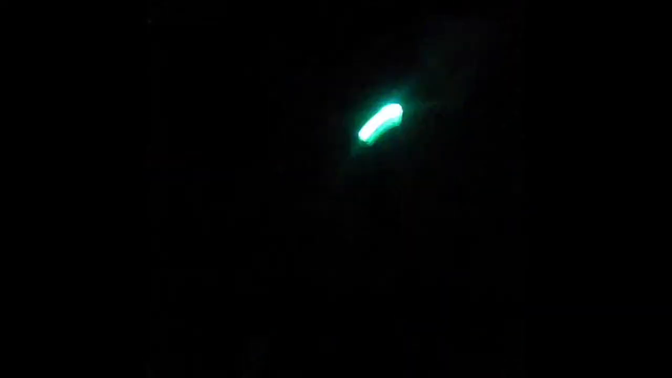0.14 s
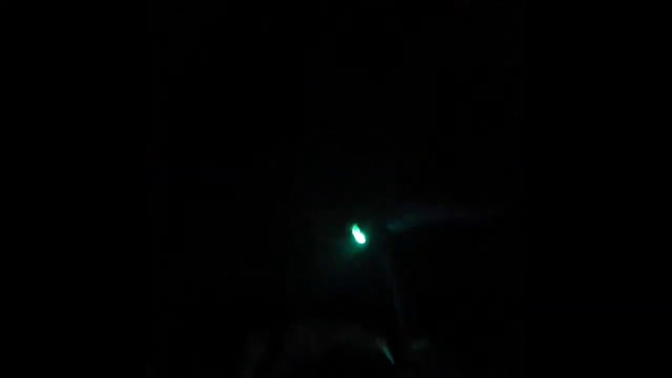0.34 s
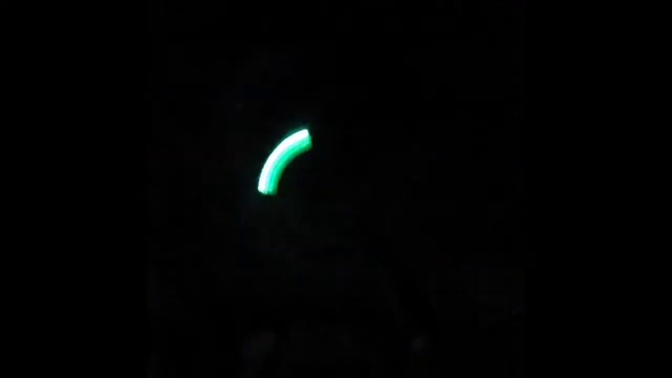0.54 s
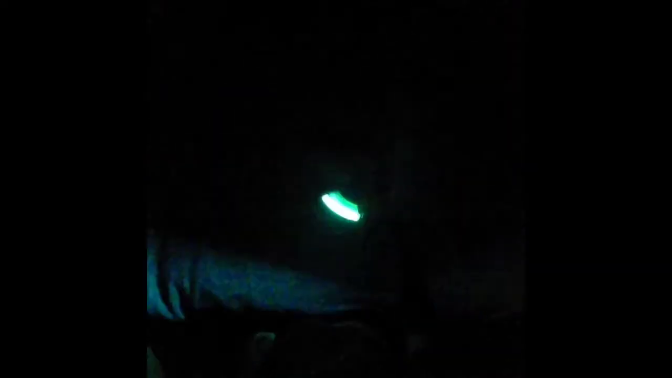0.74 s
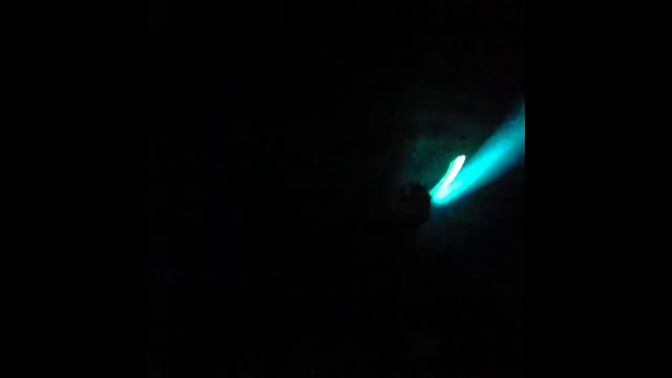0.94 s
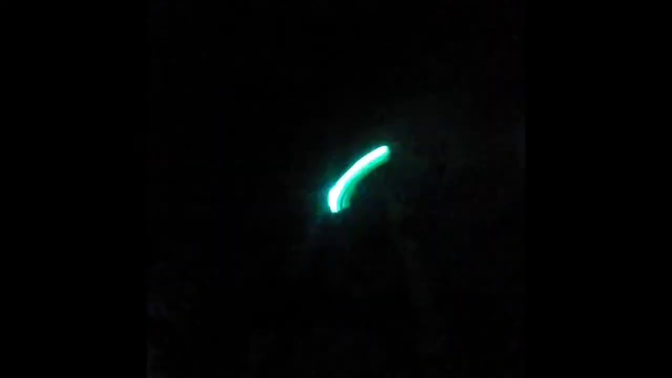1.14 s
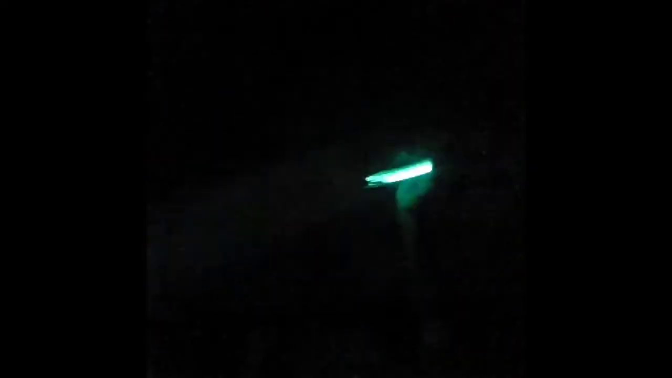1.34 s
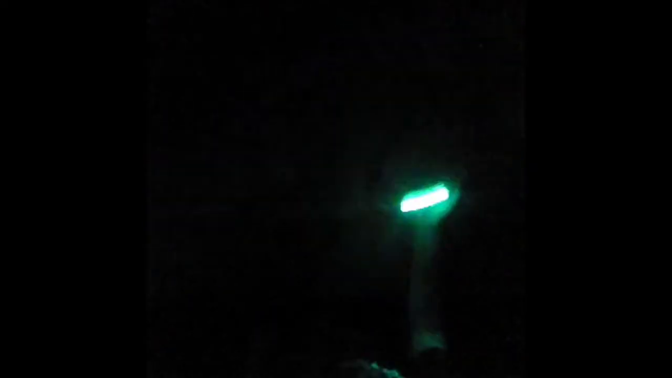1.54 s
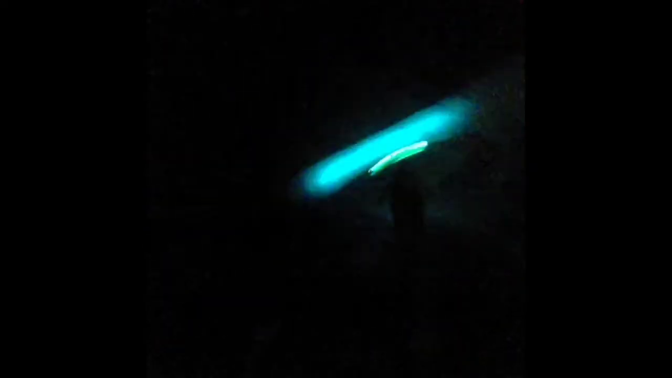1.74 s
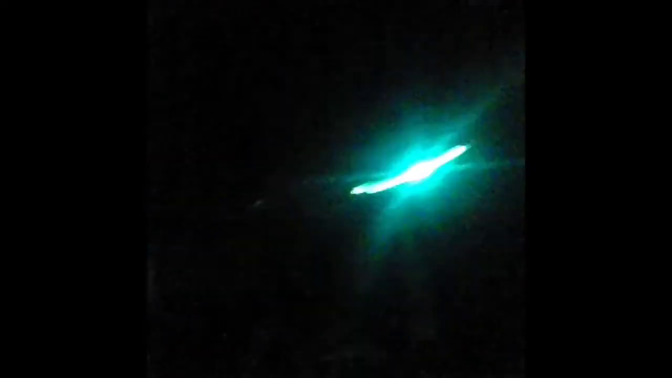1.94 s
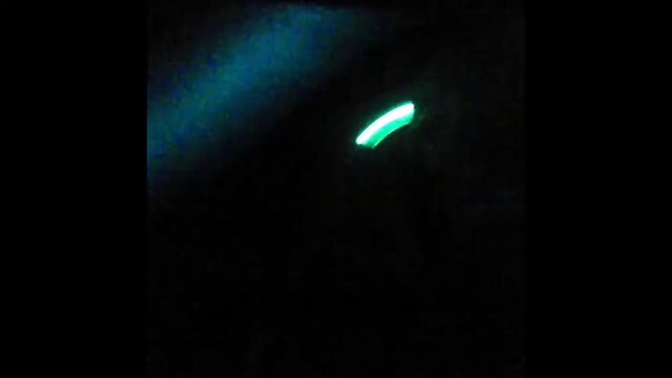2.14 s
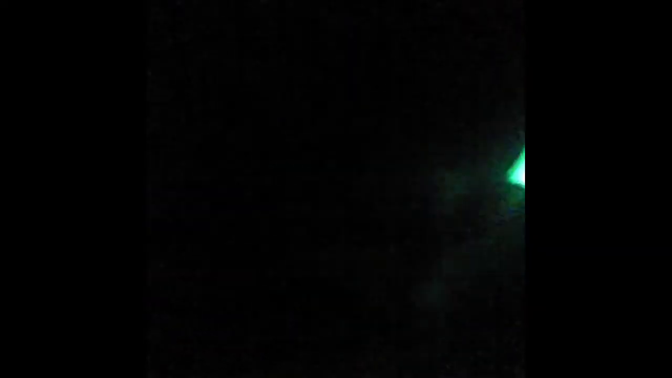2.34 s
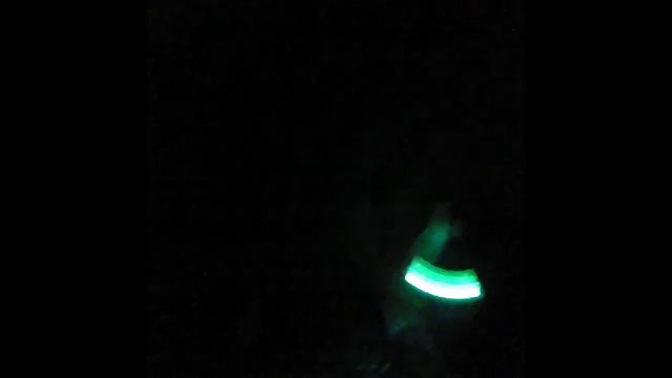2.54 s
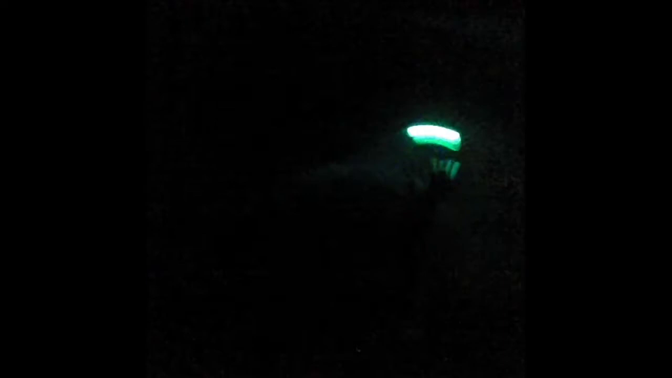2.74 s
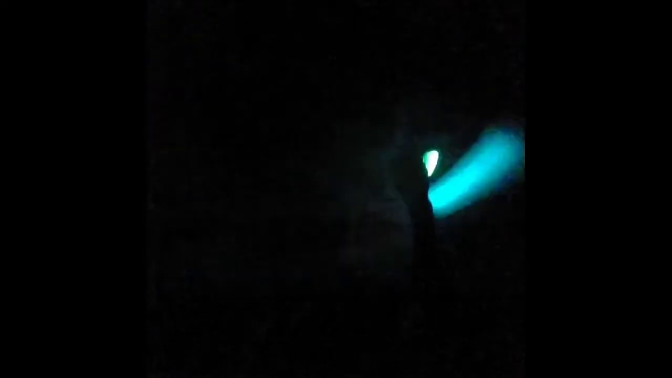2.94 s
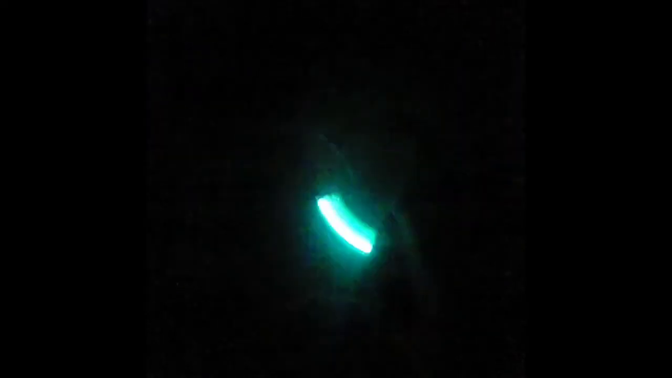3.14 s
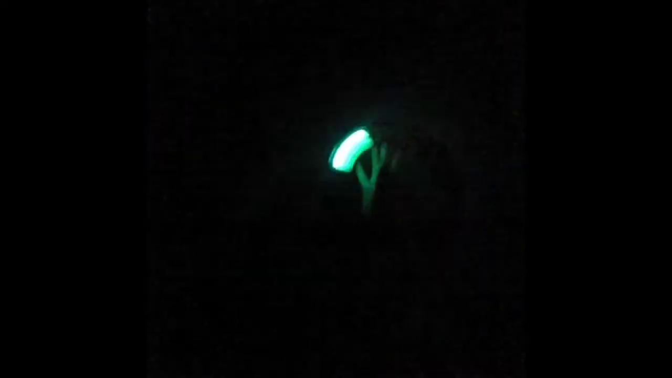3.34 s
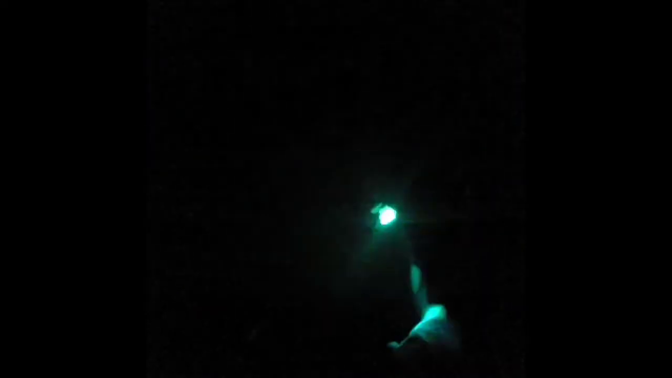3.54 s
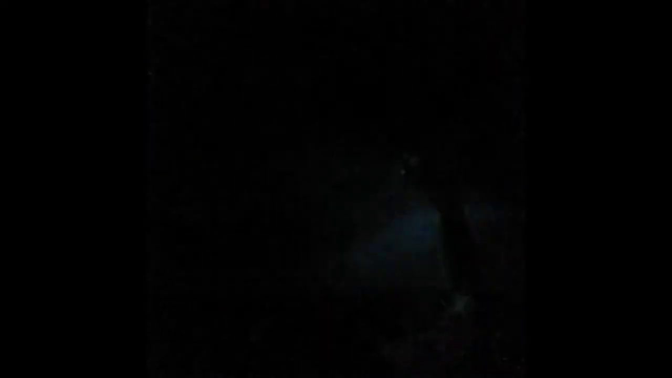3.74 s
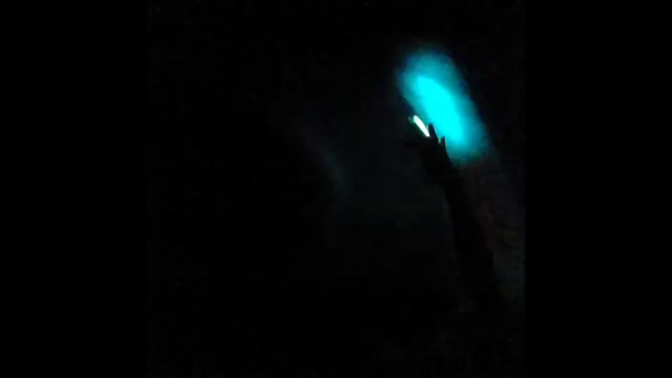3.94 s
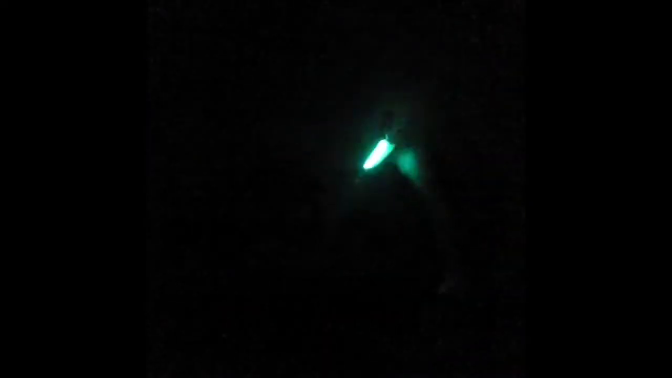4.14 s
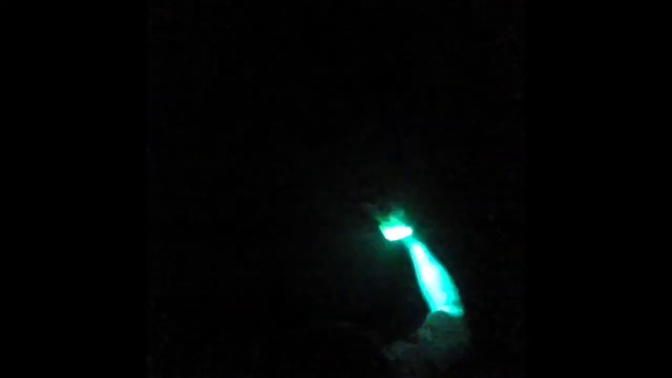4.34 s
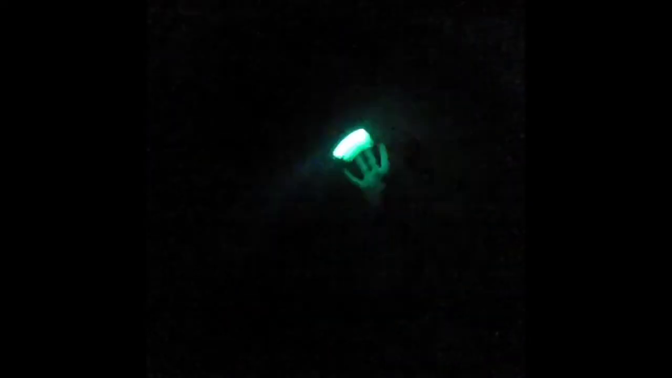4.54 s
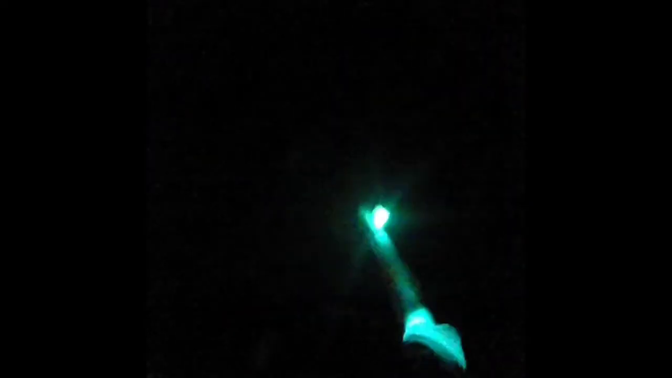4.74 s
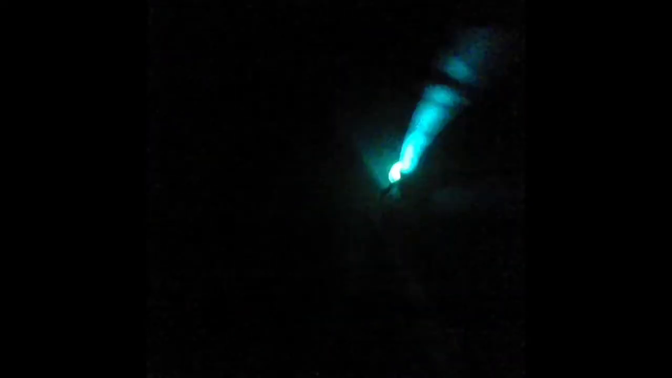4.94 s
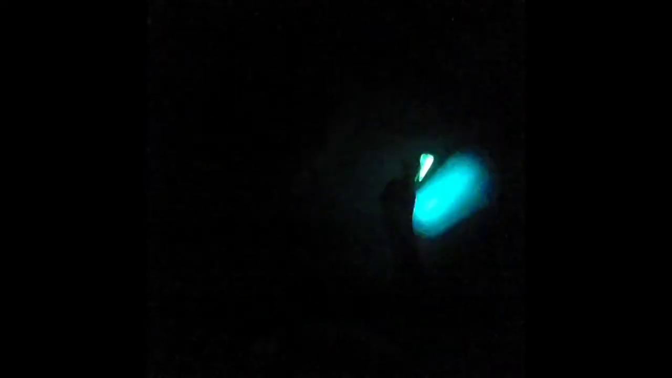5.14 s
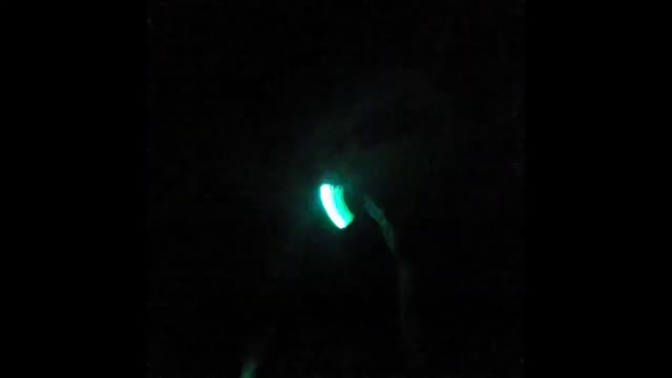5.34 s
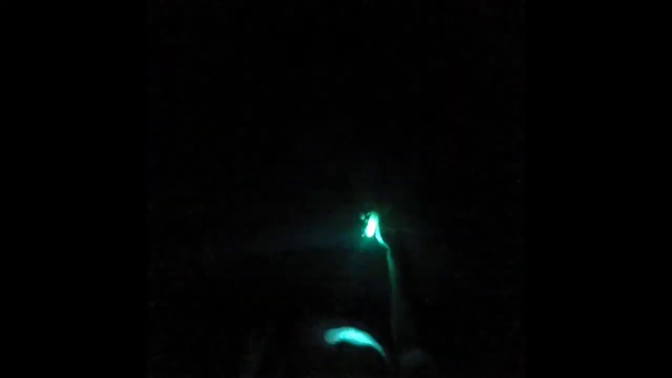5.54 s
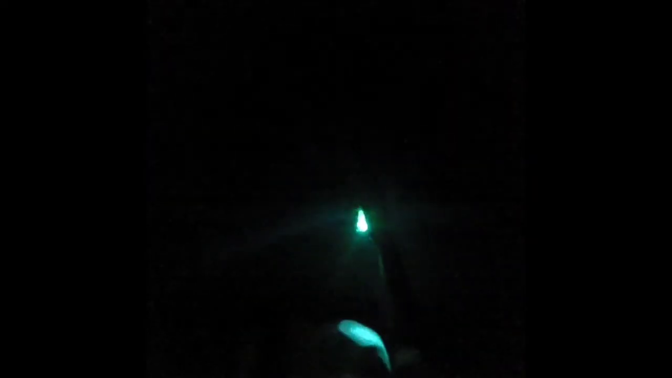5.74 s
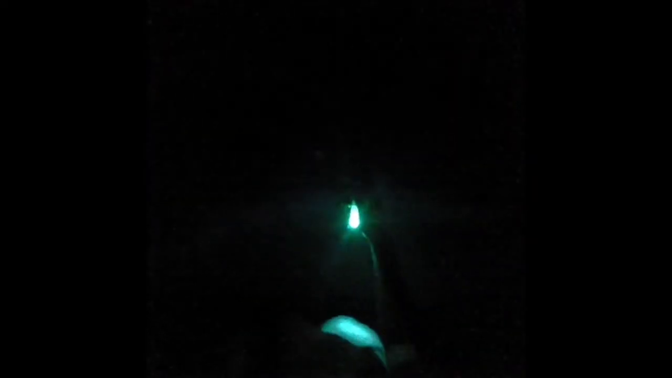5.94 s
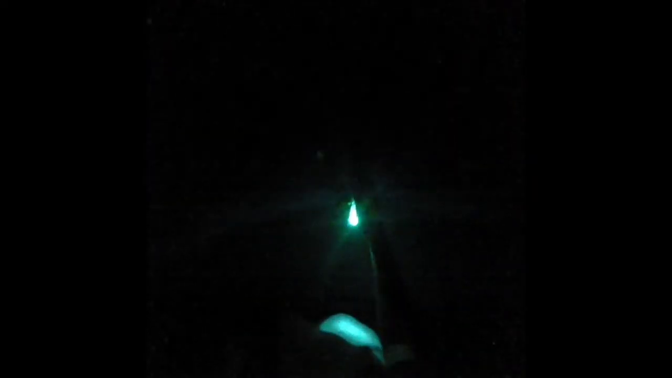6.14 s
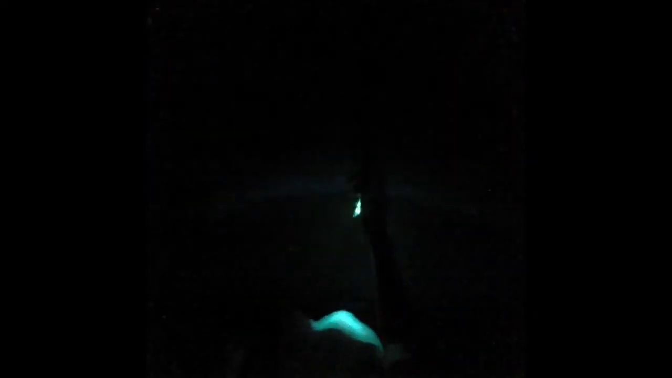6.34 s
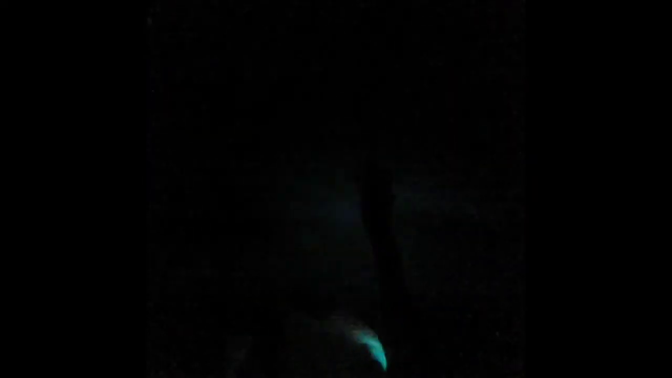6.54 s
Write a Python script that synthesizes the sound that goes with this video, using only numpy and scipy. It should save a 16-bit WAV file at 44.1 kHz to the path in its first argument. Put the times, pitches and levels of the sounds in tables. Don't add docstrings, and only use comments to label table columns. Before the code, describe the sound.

Close, dry metallic clacking of a flipped butterfly-style knife in a small room, with ticks, rattles, short pings and one loud closing slam.

```python
import sys
import numpy as np
from scipy import signal
from scipy.fft import rfft, irfft
from scipy.io import wavfile
from scipy.ndimage import uniform_filter1d

SR = 44100
rng = np.random.default_rng(int(sys.argv[2]) if len(sys.argv) > 2 else 0)


def master_out(mix):
    frames = np.transpose(np.atleast_2d(mix))
    ceiling = np.clip(frames, -1, 1)
    pcm = np.round(ceiling * 32767).astype(np.int16)
    wavfile.write(sys.argv[1], SR, pcm)


def gain_from_db(level_db):
    decades = np.asarray(level_db, float) / 20
    return 10 ** decades


N = 295029

PART_BORDERS_HZ = [700, 3200, 5500, 6800, 9200, 15500]
# [pitch_hz, level_db]
CRACK_COLOUR = [(200, -31.5), (550, -19.5), (900, -12), (1250, -8.5), (1700, -1.5), (3200, -3.5),
                (4500, 4.5), (5800, -5), (7900, 0), (9300, -2), (12600, -2), (13700, -4.5), (14250, -17),
                (14800, -7), (15600, -12)]
# [pitch_hz, level_db, t60_s]
STEEL_MODES = [(860, -11, 0.036), (1670, -6.5, 0.021), (2556, -11.5, 0.013), (4104, -14, 0.037),
               (4610, -11.5, 0.037), (4790, -13, 0.029), (6420, -7, 0.035), (7580, -9, 0.026),
               (7280, -8, 0.021), (7930, 1, 0.021), (8030, -8, 0.03), (8670, -8.5, 0.024),
               (9530, -5, 0.015), (9940, -10.5, 0.019), (10260, -7, 0.014), (11130, -3, 0.03),
               (11770, -4, 0.015), (12140, -11.5, 0.023), (12640, -2, 0.026), (13170, -5, 0.016),
               (15200, -12, .03)]
# [pitch_hz, t60_s]
ROOM_DECAY = [(500, 0.12), (2000, 0.14), (5000, 0.15), (12000, 0.11)]
# [pitch_hz, level_db]
HUM_LINES = [
    (293, -73),
    (239, -77.5),
]
# [start_s, level_db, pitch_hz, width_hz,
# t60_s]
THUMPS = [(1.006, -53.5, 536, 250, 0.1), (1.007, -55, 210, 79.8, 0.11), (1.49, -58, 497.4, 300, .1),
          (1.724, -58, 764, 597, 0.061), (1.813, -48.5, 249, 114, 0.14), (1.815, -42, 838, 200, 0.073),
          (1.82, -57, 619, 500, 0.32), (2.047, -54, 896, 350, 0.071), (2.935, -66, 679, 80, 0.11),
          (5.423, -52, 250.3, 120, 0.092), (6.045, -61.5, 170, 59.8, 0.22), (6.08, -62, 632, 601, 0.11)]
# [pitch_hz, level_db per Hz]
HISS_COLOUR = [(30, -10), (90, -28.5), (112, -12.5), (190, -2.5), (310, -11.5), (350, -15), (900, -20),
               (1600, -22), (5500, -24), (9700, -30), (12500, -26.5), (15250, -27.5), (15550, -40.5),
               (16500, -58.5)]
HISS_DB = -65.5
# [start_s, blow_db, wall_share_db]
SLAM_SHUT = (5.4232, -9.5, -5)
# [pitch_hz, level_db per Hz]
SLAM_SPECTRUM = [(150, -45.5), (400, -32.5), (1400, -29), (1950, -22.5), (2520, -18.5), (4570, -11),
                 (6500, -7.5), (8500, -10), (12000, -9), (15400, -16.5)]
# [start_s, blow_db, knock_db, low_ring_db, high_ring_db]
HARD_CLACKS = [(0.2191, -24.5, -21, -14, -2.5), (0.2483, -12, -31, -10.5, -2.5),
               (0.457, -30.5, -20.5, -11.5, -2), (0.6798, -27.5, -15.5, -13.5, -3.5),
               (0.6869, -23, -19, -15, -7), (0.778, -31.5, -15, -14, -6), (1.0095, -19, -21.5, -16.5, -5.5),
               (1.4744, -33, -12, -8, -6.5), (1.4935, -13.5, -21, -16, -6),
               (1.8201, -17.5, -15.5, -11, -3.5), (2.0488, -34, -9, -16.5, -3), (2.394, -34, -15, -18, -5),
               (2.7265, -30, -23.5, -25.5, -5.5), (2.77, -26.5, -16, -8.5, -6),
               (3.4013, -37, -10.5, -6, -5.5), (3.8559, -31, -11.5, -11.5, -3), (4.256, -35, -16, -5.5, -5),
               (4.2771, -25.5, -32, -14, -8.5), (4.2863, -13, -26, -15.5, -2.5),
               (4.5069, -27, -10.5, -15, -8.5), (4.5441, -33.5, -17.5, -11, -2.5),
               (4.7138, -28, -17, -9, -4.5), (5.113, -34, -21, -11, -1), (6.6385, -29, -12.5, -8.5, -3.5)]
# [start_s, blow_db, knock_db, low_ring_db]
PIVOT_TICKS = [(0.1003, -46.5, -11, -13.5), (0.2055, -39, -17, -12.5), (0.3298, -39, -15.5, -3.5),
               (0.426, -44.5, -12, -6.5), (0.5081, -37, -14, -8), (0.6113, -44.5, -3, -18),
               (0.6709, -36.5, -27, -11), (0.8363, -42, -14, -7.5), (1.1181, -43.5, 1, -14),
               (1.1518, -40.5, -6, -7), (1.248, -38.5, -9.5, -11), (1.584, -38.5, -15.5, -14.5),
               (1.7572, -42.5, -11, -8), (1.964, -44.5, -9, -8.5), (2.3035, -34, -15, -11.5),
               (2.59, -37, -14, -10), (3.1365, -46, -24, -2), (3.1652, -41, -11.5, -13),
               (3.351, -40, -12, -7.5), (3.5224, -35, -8.5, -9.5), (3.587, -37.5, -16, -8),
               (4.085, -41, -17, -10.5), (4.1386, -38.5, -11, -10.5), (4.347, -37, -7.5, -11),
               (4.672, -38, -12.5, -9.5), (4.823, -52, -13, -10.5), (5.032, -41, -16, -7.5),
               (5.086, -41, -21, -4), (5.2164, -37.5, -12, -5.5), (5.3747, -40, -18.5, -15)]
# [start_s, blow_db, knock_db]
LIGHT_TOUCHES = [(0.0041, -56.5, -2), (0.0536, -50.5, -20), (0.6084, -48.5, -14), (0.7668, -36, -16),
                 (0.9936, -43.5, -10), (1.2081, -43.5, -3), (1.384, -46, -8.5), (1.4697, -48, -4),
                 (1.816, -39, -7), (1.961, -55, -8), (2.253, -50.5, -5), (2.2998, -44, -21),
                 (2.3909, -45.5, -10), (2.479, -47, -8.5), (2.586, -52, -8), (2.621, -48, -12),
                 (2.646, -48.5, -21), (2.8734, -51, -9), (3.1286, -45.5, -7), (3.266, -47, -16),
                 (3.752, -54, -8.5), (3.786, -48, -8), (3.8077, -44.5, -9.5), (3.923, -42.5, -14),
                 (4.013, -49, -8), (4.904, -44, -9), (5.028, -55, -8), (5.4201, -40, -10),
                 (6.4855, -56, -0.5), (6.594, -49, -4)]
# [start_s, blow_db]
FAINT_GRAZES = [(0.0734, -57.5), (0.2009, -53.5), (0.8317, -53), (0.9455, -58), (0.952, -55.5),
                (1.147, -50), (1.39, -51), (2.002, -62), (2.0912, -56.5), (2.278, -49.5), (2.4635, -54),
                (2.5028, -56), (2.558, -53), (2.6874, -54), (2.9548, -53.5), (3.1554, -56), (3.28, -47.5),
                (3.3419, -57), (3.5017, -50), (4.0387, -42), (4.2242, -57.5), (4.3908, -59),
                (4.9136, -43.5), (5.1343, -45.5), (5.3314, -61.5), (5.6016, -63), (5.6296, -61),
                (5.89, -66), (6.478, -62), (6.488, -59.5)]
# [start_s, blow_db]
REBOUNDS = [(0.2155, -32.5), (0.2543, -26), (0.262, -32), (0.3357, -32.5), (0.4292, -34.5),
            (0.4534, -37), (0.4656, -33.5), (0.6838, -22), (1.0016, -43), (1.0172, -13),
            (1.2757, -41), (1.5018, -20), (1.5196, -20), (2.0564, -36.5), (2.0794, -39),
            (2.407, -41), (2.729, -33), (2.8075, -26.5), (3.361, -39.5), (3.4075, -30.5),
            (3.4153, -36), (3.5192, -43), (3.5943, -34.5), (4.093, -37.5), (4.2627, -31.5),
            (4.2898, -16), (4.2954, -17), (5.2368, -44), (6.6455, -29.5), (6.675, -39)]
# [start_s, length_s, first_blow_db, last_blow_db]
LOOSE_RATTLES = [(0.41, 0.018, -55, -50), (0.84, .03, -47, -67.5), (1.156, 0.024, -38, -43.5),
                 (1.233, .009, -47, -44.5), (1.254, .03, -41, -45.5), (1.426, 0.036, -61.5, -61.5),
                 (1.764, 0.044, -43.5, -55), (1.968, 0.019, -44, -50.5), (2.288, .007, -55.5, -60),
                 (3.171, .008, -42, -41.5), (3.531, 0.055, -46.5, -54), (3.607, 0.045, -49, -56),
                 (3.827, .014, -43, -46), (3.865, 0.027, -36.5, -47.5), (3.93, .005, -43, -48),
                 (4.018, 0.058, -50, -46), (4.114, 0.02, -43, -44), (4.144, 0.018, -45, -49.5),
                 (4.353, .022, -45.5, -42.5), (4.547, 0.0087, -33.5, -38), (4.678, 0.021, -42, -42),
                 (4.824, 0.0044, -42, -44), (4.864, 0.022, -51, -55.5), (5.039, .011, -43.5, -44.5),
                 (5.376, .011, -41.5, -48.5), (6.602, 0.016, -52.5, -62)]
# [start_s, level_db, pitch_hz, width_hz, length_s]
CLOTH_RUBS = [(1.83, -60, 248, 140, 0.14), (2.14, -56, 247, 95.04, 0.054), (2.143, -64, 930, 850, 0.08),
              (4.56, -58.5, 215, 90, 0.067), (4.555, -63, 535, 99, 0.082), (6.078, -65.5, 520, 110, 0.037),
              (5.71, -71, 1100, 540, 0.073), (5.73, -68.5, 1800, 250, 0.066),
              (6.075, -70.5, 830, 200, 0.027), (5.975, -52.5, 165, 50, 0.07), (6.083, -70, 1100, 35, 0.066),
              (6.086, -71.5, 1690, 50, 0.072)]
# [start_s, low_mode_db, high_mode_db]
BLADE_PINGS = [(.002, -61, -66), (.26, -43, -31), (0.334, -60, -64), (.457, -60, -35), (.51, -62, -58),
               (3.137, -56, -48), (3.407, -48, -44), (3.59, -51.5, -46), (3.786, -73, -49),
               (4.093, -55.5, -40.5), (4.256, -46, -56.5), (4.29, -45, -26.5), (4.365, -52.5, -72),
               (4.553, -62, -40), (5.04, -57, -56), (1.51, -53, -36)]
# [pitch_hz, t60_s]
BLADE_MODES = [
    (4215, .22),
    (7930, .12),
]
# [start_s, pitch_hz, level_db, pitch_hz, level_db]
LEADING_MODES = [(0.2193, 7950, 18, 4704, 16), (0.2484, 7830, 12, 11340, 7), (0.3298, 4900, 12, 8030.0, 5),
                 (0.457, 7910, 22, 12670.0, 11), (0.5084, 8000, 20, 12640.0, 11),
                 (0.6797, 12000, 9.0, 7640, 2), (0.6867, 11330.0, 9, 12400, 8),
                 (0.778, 7880.0, 12.5, 11450.0, 7), (1.0098, 12370, 5, 11240, 3),
                 (1.1518, 5340.0, 7, 6170, 2), (1.2482, 4740, 6, 9240, 6),
                 (1.4744, 12140.0, 5.0, 4150.0, 9), (1.4933, 12600, 15, 10540.0, 11.5),
                 (1.5832, 7920.0, 18, 9300.0, 11), (1.82, 7850, 10.5, 11060, 4),
                 (2.0484, 8200, 5.5, 11260.0, 3), (2.3032, 12570.0, 7, 7920.0, -2),
                 (2.394, 7900, 1, 10580.0, 9), (2.5885, 4230, 0, 7820.0, 0), (2.7267, 4850, 9, 7930, 15),
                 (2.769, 8000, 7, 7270, -2), (3.1652, 7850.0, 13, 11400, 11.5),
                 (3.351, 4700, 5.5, 11650, 12), (3.4015, 4173, 13, 11970, 12), (3.5226, 7580, 11, 4740, 4),
                 (3.588, 7930, 9, 4197, 13), (3.8557, 7810.0, 11, 10800, -3), (4.1366, 8200.0, 9, 4620, 5),
                 (4.256, 4230, 15, 7840.0, 13), (4.2771, 11800, 14, 7570, 10.0),
                 (4.2864, 7970, 8, 7327, 11.5), (4.5067, 10800, 5, 4750, 4.5), (4.5442, 7760, 14, 12200, 1),
                 (4.672, 12640.0, 13, 4170, 14), (4.7136, 7770, 3, 6400, 0), (5.032, 7940, 10, 4120.0, 14),
                 (5.113, 8120, 9, 7580, -3), (5.2165, 4520, 13.5, 7910.0, 7),
                 (5.3747, 7960.0, 14, 11660, 6.5), (6.6383, 7740, 9, 4240, 8)]
# [start_s, pitch_hz, level_db, pitch_hz, level_db]
SECOND_MODES = [(0.2193, 12230.0, 3.5, 11720.0, 0.5), (0.2484, 4240, 12.5, 12500, 3),
                (0.457, 9700, 4, 4520.0, 2), (0.6867, 7730, 3, 7220.0, 4.5), (1.0098, 10400, 4.5, 8460, 4),
                (1.4933, 7940, 5.5, 10000, 8), (1.82, 12510.0, 3, 13500, 5), (2.769, 11000, 4, 4740, 4),
                (4.2771, 9860.0, 2.5, 12870.0, 0.5), (4.2864, 12000, 6.5, 11300, 2.5),
                (4.7136, 4876, 10, 12500.0, 9), (6.6383, 8440, 8, 11010.0, 4)]
# [start_s, pitch_hz, level_db]
HANDLE_KNOCKS = [(0.2193, 2550, 11), (0.2484, 3110, -3), (0.3298, 1840.0, -2), (0.457, 1610, 10),
                 (0.5084, 1600, 15), (0.6797, 1890, 5), (0.6867, 2524, 3.5), (0.778, 2370, 7),
                 (1.0098, 1670.0, -11), (1.1518, 1920, -1), (1.2482, 2360, -1.0), (1.4744, 1820.0, 4.0),
                 (1.4933, 2020, 4), (1.5832, 2790.0, 1), (1.82, 2876, -1.0), (2.0484, 2680, 5),
                 (2.3032, 2400.0, -4), (2.394, 3080.0, 3), (2.5885, 1610, 2), (2.7267, 1590, 10),
                 (2.769, 2660.0, -4), (3.1652, 1480, 8), (3.351, 1350, 9), (3.4015, 1660, 5),
                 (3.5226, 1270, 2), (3.588, 1560, 13), (3.8557, 2553, -3), (4.1366, 1690, -3),
                 (4.256, 1700, 17), (4.2771, 1695, -5), (4.2864, 2460, 9), (4.5067, 2100, 0),
                 (4.5442, 3088, -2), (4.672, 3027, -2.0), (4.7136, 2570, 4), (5.032, 1960, -4),
                 (5.113, 2070, 7), (5.2165, 1670.0, 5), (5.3747, 1800, 5), (6.6383, 1720, 7)]
# [pitch_hz, level_db, t60_s]
CLAMPED_MODES = [(2573, -6, 0.019), (3755, -3, .015), (4940, -9, .015), (6270, -1.5, 0.01),
                 (10840, -4.5, 0.0081), (12670, -8, 0.0055)]
# [start_s, blow_db]
MORE_REBOUNDS = [(.2505, -20), (.2925, -40), (1.038, -31), (1.053, -39), (1.066, -43), (1.531, -29),
                 (1.553, -33), (4.312, -27), (4.327, -30), (1.859, -36), (2.878, -50), (0.6813, -26.5),
                 (.689, -23.5), (0.694, -26), (.698, -28), (1.014, -25), (1.026, -27), (1.4977, -22),
                 (1.5075, -22), (1.8242, -21.5), (1.8284, -25), (1.833, -29), (1.839, -28), (1.843, -27.5),
                 (1.851, -30), (2.0547, -37), (2.0848, -46), (2.7747, -35), (2.778, -31), (2.783, -31),
                 (2.791, -26), (2.797, -32), (2.8127, -34.5), (2.817, -30), (2.822, -36), (2.83, -45),
                 (4.299, -24), (4.7165, -29), (4.7225, -29.5), (4.7275, -24.5), (4.737, -27.5),
                 (5.4312, -20.5)]

CHATTER_GAP_S = 0.007


def evened(x):
    return x / np.sqrt(np.mean(x ** 2) + 1e-20)


def smooth_waver(count, size):
    drift = uniform_filter1d(rng.standard_normal(count), size)
    return evened(uniform_filter1d(drift, size))


def read(points, hz):
    f, value = np.transpose(points)
    return np.interp(np.log(hz + 1), np.log(f + 1), value)


def add(mix, start_s, sound):
    part = mix[max(round(start_s * SR), 0):][:len(sound)]
    part += sound[:len(part)]


def causal(gain):
    cepstrum = irfft(np.log(gain + 1e-5))
    half = len(cepstrum) // 2
    fold = np.r_[1, 2 * np.ones(half - 1), 1, np.zeros(half - 1)]
    return np.exp(rfft(cepstrum * fold))


def hiss_and_hum():
    hz, t = np.fft.rfftfreq(N, 1 / SR), np.arange(N) / SR
    hiss = evened(irfft(rfft(rng.standard_normal(N)) * gain_from_db(read(HISS_COLOUR, hz)), N))
    out = gain_from_db(HISS_DB) * hiss
    for pitch_hz, level_db in HUM_LINES:
        waver = smooth_waver(N, 3000)
        phase = 2 * np.pi * np.cumsum(pitch_hz + 2.6 * waver) / SR
        out += gain_from_db(level_db + 2 + 0.99 * waver) * np.sin(phase)
    return out


def pings():
    out, t = np.zeros(N), np.arange(SR // 4) / SR
    for start_s, *levels_db in BLADE_PINGS:
        detune = 1 + 0.0023 * rng.standard_normal()
        for (hz, t60), level_db in zip(BLADE_MODES, levels_db):
            fade_db = level_db + 3.2 * smooth_waver(len(t), 150) - 60 * t / t60
            add(out, start_s, gain_from_db(fade_db) * np.sin(2 * np.pi * hz * detune * t))
    return out


def ringing(modes, t):
    hz, db, t60 = np.reshape(modes, (-1, 3)).T[:, :, None]
    return np.sum(gain_from_db(db - 60 * t / t60) * np.sin(2 * np.pi * hz * t), axis=0)


def leading_modes(times):
    out = [[] for _ in times]
    steel, handle = (LEADING_MODES + SECOND_MODES, -8.5, 0.055), (HANDLE_KNOCKS, -5, 0.029)
    for table, base_db, t60 in [steel, handle]:
        for start_s, *pairs in table:
            nearest = np.argmin(abs(times - start_s))
            out[nearest] += [(hz, db + base_db, t60) for hz, db in zip(pairs[::2], pairs[1::2])]
    return out


def strike(blow_db, knock_db, low_db, high_db, leads, chance):
    t = np.arange(2048) / SR
    hz, db, t60 = np.transpose(STEEL_MODES)[:, :, None]
    spot, phase, detune, grip = np.clip(chance, -2, 2)[:, :, None]
    hz = hz * (1 + 0.011 * detune)
    t60 = t60 * np.exp(0.078 * grip)
    modes = gain_from_db(db + 3.9 * spot - 60 * t / t60) * np.sin(2 * np.pi * hz * t + np.pi * phase)
    free_db = 0.51 * (high_db + 5.5) + 0.19 * (blow_db + 32.0)
    ring = gain_from_db(free_db) * np.sum(modes, axis=0)

    crack, lumps, patches = rng.standard_normal((3, len(t)))
    crack = crack * gain_from_db(2.8 * evened(uniform_filter1d(lumps, 24)))
    crack = crack * gain_from_db(11.5 - 60 * t / 0.013)
    sound = (crack + ring + ringing(leads, t)) * np.minimum(t / 0.0004, 1)

    rest = max(1 - gain_from_db(2 * low_db) - gain_from_db(2 * high_db), 0.1)
    shares = np.array([gain_from_db(2 * knock_db), gain_from_db(2 * low_db), 0.1 * rest, gain_from_db(2 * high_db), 1.25 * rest])
    f = np.fft.rfftfreq(len(t), 1 / SR)
    z = rfft(np.roll(sound, 128))
    pattern = evened(uniform_filter1d(uniform_filter1d(patches, 20), 20))[:len(f)]
    gain = gain_from_db(read(CRACK_COLOUR, f)) * gain_from_db(2.3 * pattern)
    found = np.histogram(f, PART_BORDERS_HZ, weights=abs(z * gain) ** 2)[0]
    centres = np.sqrt(np.multiply(PART_BORDERS_HZ[1:], PART_BORDERS_HZ[:-1]))
    balance = np.transpose([centres, 10 * np.log10(shares / found)])
    sound = irfft(z * causal(gain * gain_from_db(read(balance, f))))
    return sound / np.sqrt(np.mean(sound[140:204] ** 2))


def knife():
    usual = (0, 0, -12, -9.5, -4)  # knock, low and high ring shares in dB where a row gives none
    struck = HARD_CLACKS + PIVOT_TICKS + LIGHT_TOUCHES
    contacts = np.array(sorted(tuple(row) + usual[len(row):] for row in struck))
    times, blows_db = contacts[:, 0], contacts[:, 1]
    lead_in = (np.diff(times, append=99) < 0.024) & (np.diff(blows_db, append=-99) > 0)
    leads = leading_modes(times)
    single = [row[:2] for row in struck + FAINT_GRAZES + REBOUNDS + MORE_REBOUNDS]
    slam_s, slam_db, slam_wall_db = SLAM_SHUT
    sounds = [(slam_s, gain_from_db(slam_db) * slam(), slam_wall_db, 0)]
    for k, (start_s, blow_db) in enumerate(single + chatter()):
        chance = rng.standard_normal((4, len(STEEL_MODES)))
        last = max(np.searchsorted(times, start_s, "right") - 1, 0)
        bounce = k >= len(contacts)
        own = [(hz * (1 + 0.003 * shift), db - 5.5 * bounce, t60)
               for (hz, db, t60), shift in zip(leads[last], chance[2])]
        sound = gain_from_db(blow_db) * strike(blow_db, *contacts[last, 2:], own, chance)
        if k >= len(single):
            sound = skitter(sound)
        sounds.append((start_s, sound, 2 + 2.5 * lead_in[last] - 3.5 * bounce, k % 3))

    direct, outward = np.zeros(N), np.zeros((3, N))
    for start_s, sound, wall_db, way in sounds:
        onset_s = start_s - 140 / SR
        add(direct, onset_s, sound)
        add(outward[way], onset_s, gain_from_db(wall_db) * sound)
    return direct, outward


def room(x):
    taps = np.zeros(SR // 3)
    at = np.arange(120, len(taps) - 20, 12)
    taps[at + rng.integers(0, 12, len(at))] = rng.choice([-1., 1.], len(at))
    hz, t, z = signal.stft(taps, SR, nperseg=128)
    fade = gain_from_db(-60 * t / read(ROOM_DECAY, hz)[:, None])
    tail = signal.istft(z * fade, SR, nperseg=128)[1]
    return signal.oaconvolve(x, tail / np.linalg.norm(tail))[:N]


def walls(outward):
    sweep_depth, tails = 0.91, []
    for x in outward:
        sweep = 1 + sweep_depth * smooth_waver(N, 40)
        tails.append(room(x * sweep / np.hypot(1, sweep_depth)))
    return sum(tails)


def chatter():
    rows, k = [], np.arange(10)
    for start_s, length_s, first_db, last_db in LOOSE_RATTLES:
        jitter, size = np.clip(rng.standard_normal((2, len(k))), -2, 2)
        late_s = CHATTER_GAP_S * (k + 0.3 * jitter * (k > 0))
        blow_db = first_db + (last_db - first_db) * late_s / length_s + 2.5 * size
        sounding = late_s <= length_s
        rows += zip(start_s + late_s[sounding], blow_db[sounding])
    return rows


def skitter(sound):
    train = np.zeros(round(CHATTER_GAP_S * SR) + 1)
    place, size = rng.random(4), rng.standard_normal(4)
    place[0] = 0
    train[(place * len(train)).astype(int)] = np.sign(size) * gain_from_db(-6.5 + 3 * abs(size))
    return signal.fftconvolve(sound, train)


def puff(t, hz, width_hz):
    turn, r = np.exp(2j * np.pi * hz * t), np.exp(-np.pi * width_hz / SR)
    noise = rng.standard_normal(3 * len(t))
    slow = signal.lfilter([1], np.convolve([1, -r], [1, -r]), noise)[-len(t):]
    return evened((turn * (evened(slow) + 35 / width_hz)).real)


def thumps():
    out, t = np.zeros(N), np.arange(SR // 3) / SR
    for start_s, level_db, hz, width_hz, t60 in THUMPS:
        rise_s = 0.099 * t60
        swell = np.minimum(t / rise_s, 1) ** 2
        fade = gain_from_db(level_db - 60 * np.maximum(t - rise_s, 0) / t60)
        add(out, start_s, fade * swell * puff(t, hz, width_hz))
    return out


def cloth_rubs():
    out, t = np.zeros(N), np.arange(SR // 3) / SR
    for start_s, level_db, hz, width_hz, length_s in CLOTH_RUBS:
        arch = abs(np.sin(np.pi * np.minimum(t / length_s, 1))) ** 0.3
        add(out, start_s, gain_from_db(level_db) * arch * puff(t, hz, width_hz))
    return out


def slam():
    t = np.arange(2048) / SR
    burst = rng.standard_normal(len(t)) * gain_from_db(-60 * t / 0.019)
    crack = (burst + ringing(CLAMPED_MODES, t)) * np.minimum(t / 0.00034, 1)
    colour = gain_from_db(read(SLAM_SPECTRUM, np.fft.rfftfreq(len(t), 1 / SR)))
    crack = irfft(rfft(np.roll(crack, 128)) * causal(colour))
    return crack / np.sqrt(np.mean(crack[140:204] ** 2))


def scene():
    direct, outward = knife()
    background = hiss_and_hum() + thumps() + cloth_rubs()
    return (direct + pings() + gain_from_db(-3.0) * walls(outward) + background)[None]


def band_limit(x):
    return signal.sosfilt(signal.butter(12, 16480, fs=SR, output="sos"), x)


def record(dry):
    thin = signal.sosfilt(signal.butter(3, 90, "high", fs=SR, output="sos"), dry)
    thin = signal.sosfilt(signal.cheby2(14, 35, 15650, fs=SR, output="sos"), thin)
    return band_limit(thin)


dry = scene()
out = record(dry)
master_out(out)
```